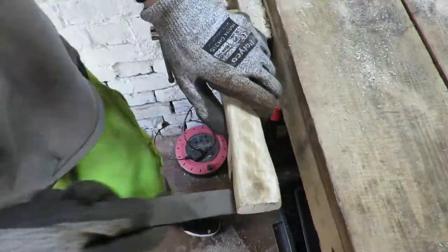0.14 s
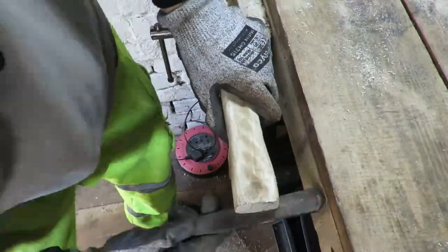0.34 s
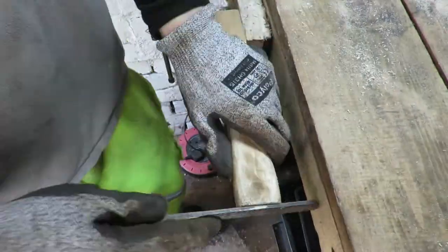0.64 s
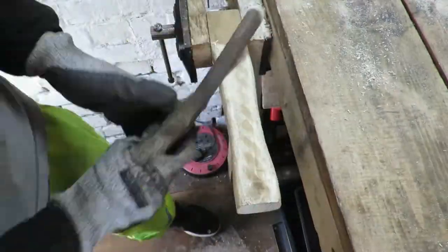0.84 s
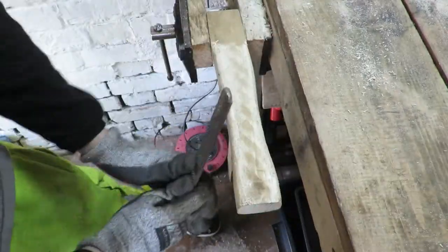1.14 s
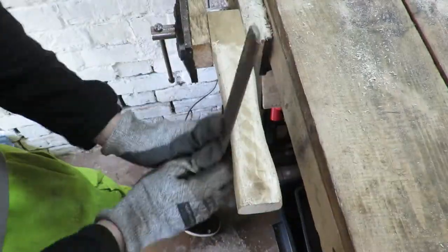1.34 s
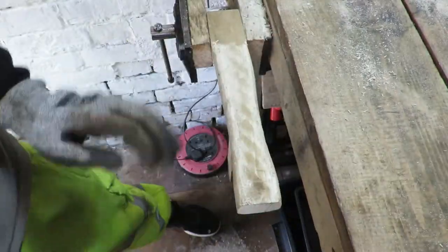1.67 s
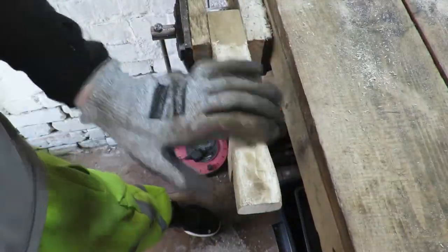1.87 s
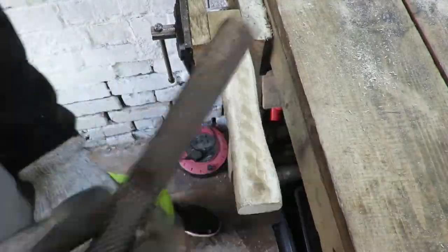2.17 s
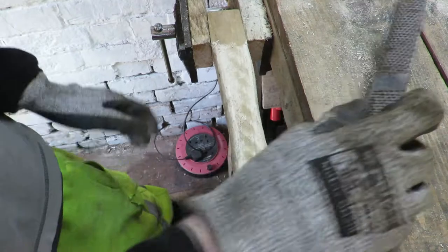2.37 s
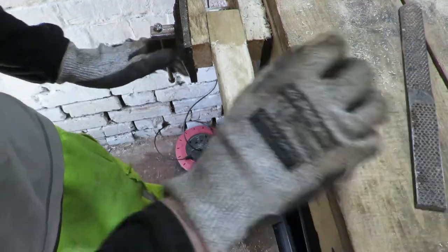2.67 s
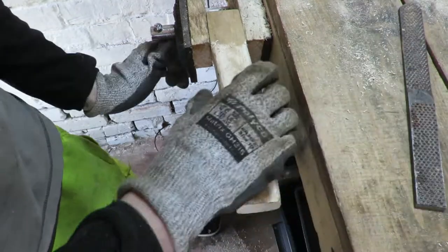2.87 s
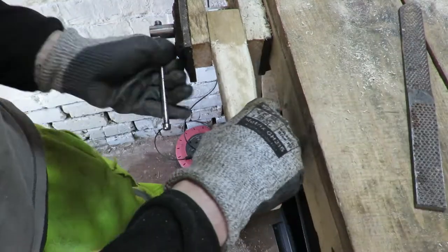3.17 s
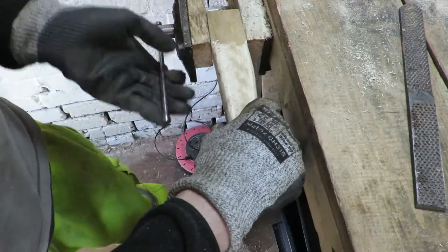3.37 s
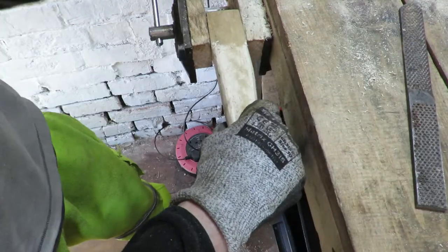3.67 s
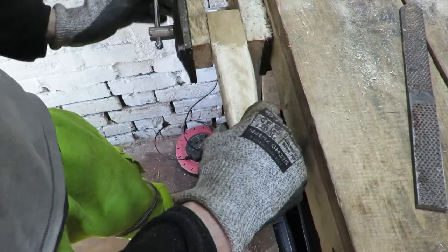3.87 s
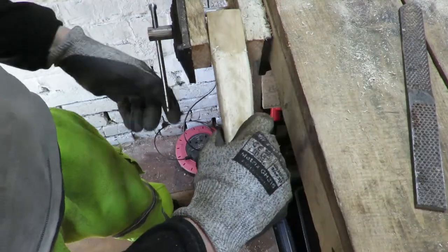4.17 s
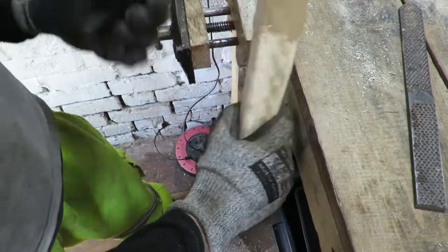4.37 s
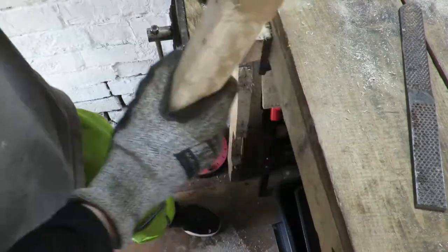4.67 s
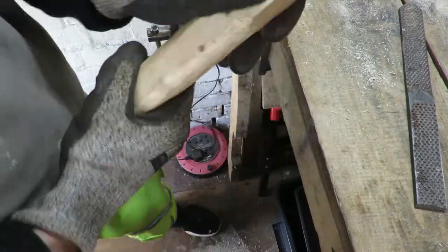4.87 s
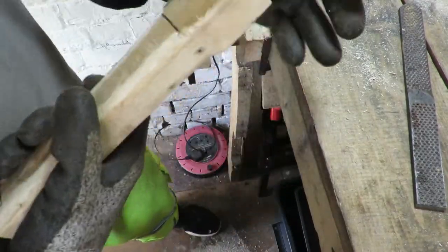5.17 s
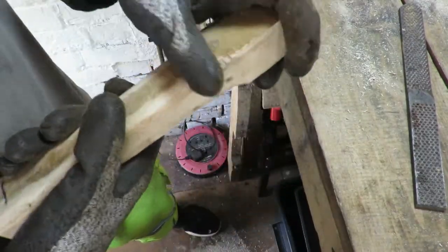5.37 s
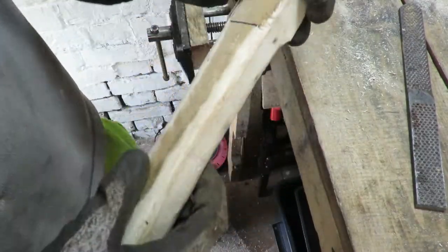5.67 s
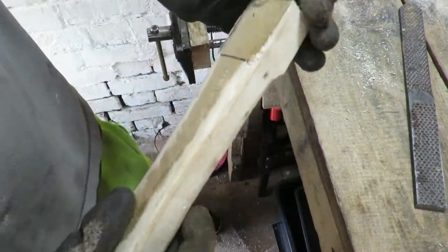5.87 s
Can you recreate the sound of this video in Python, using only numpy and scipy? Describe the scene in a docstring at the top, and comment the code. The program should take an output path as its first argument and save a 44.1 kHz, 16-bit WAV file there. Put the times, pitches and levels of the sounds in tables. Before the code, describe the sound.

Close up in a dry workshop, a coarse steel rasp skips rapidly over a clamped wooden blank, with cracks, chirps and brief squeals. Longer biting strokes follow, groaning and shaking the bench. Gloves rub, then the rasp is dropped on the bench top with a loud bouncing clatter. Quiet handling follows: soft rubs, small wood knocks, a vise bar sliding and one bright clank, ending in faint glove rubbing.

```python
"""Skips, chirps and squeals of a steel rasp on a wooden handle blank, close to the microphones in a dry workshop.
Long strokes then bite and shake the bench; the rasp is dropped on the bench top, the vise bar slides and
clanks, and gloves rub over the blank. Noise grains through spectra make the scraping, gliding sines the
squeals, struck modes the bench and steel. Each source sits slightly right, with short reflections of the room."""
import sys
import numpy as np
from scipy import signal
from scipy.io import wavfile

SR = 44100
rng = np.random.default_rng(int(sys.argv[2]) if len(sys.argv) > 2 else 0)


def transcribe(signal):
    """Save signal, clipped to [-1, 1], as a 16-bit WAV file at the path in sys.argv[1]."""
    frames = np.atleast_2d(signal).T
    limited = np.clip(frames, -1, 1)
    pcm = np.round(limited * 32767).astype(np.int16)
    wavfile.write(sys.argv[1], SR, pcm)


N = 265041
TIME = np.arange(N) / SR  # seconds

# Table levels are relative: each source sets its own balance further on.
# teeth catch an edge and the free blade twangs:
# (time [s], click level [dB], click tilt [dB per octave], twang level [dB], twang pitch [Hz])
CATCHES = [(0, -10.5, 6, -31, 540), (0.023, -45, 2, -26.5, 546), (0.1474, -3, 4.5, -18.5, 724),
           (.268, -8.5, 3.5, -21, 660), (0.2883, -6, 11.5, -31, 637), (0.405, -12.5, 4.5, -25, 690),
           (.561, -7, 0.5, -18.5, 978), (0.8443, -15.5, 1, -24.5, 825)]
# runs of even skips over the wood: (first skip [s], last skip [s], rate [skips per s], scrape level [dB],
# tooth fizz level [dB], fizz growth over the run [dB], chirp pitch [Hz], chirp level [dB], pitch scatter [octaves])
RUNS = [(0.173, 0.293, 53, -28, -30, 5.5, 3410, -29.5, 0.11),
        (0.32, 0.407, 41, -28.5, -47, 19, 2170, -26.5, .06),
        (0.441, 0.468, 60, -23.5, -55, -10.5, 2044, -21, .1),
        (0.563, 0.762, 48, -30.5, -26, -1, 2865, -26, .12),
        (.851, 1.164, 37.3, -23, -18, 12, 2049, -27.5, .18)]
# the blade glides lightly back without biting: (start [s], end [s], level [dB])
GLIDES = [(.022, .09, -31.5), (.1, .145, -43), (.48, .533, -34.5), (.765, .808, -37.5),
          (1.175, 1.195, -21.5)]
# the blade sticks and squeals: (middle [s], length [s], pitch [Hz], level [dB], overtone level [dB])
SQUEALS = [(0.167, .0056, 3090, -17, -18), (0.193, .01, 3530, -19.5, -32),
           (.212, .0054, 2960, -17.5, -11.5), (0.266, .008, 3130, -14, -33), (.325, 0.014, 2174, -28, -48),
           (0.36, 0.0039, 2100, -17.5, -39), (0.367, 0.0064, 2030, -17.5, -39),
           (.397, 0.0056, 2160, -12.5, -21.5), (0.445, 0.011, 2130, -19, -35),
           (0.571, .009, 1735, -12.5, -33.5), (0.584, .007, 2500, -10.5, -21.5),
           (.613, .0034, 3016, -9, -27.5), (0.659, .005, 2824, -11, -21), (0.6974, .0035, 2930, -26.5, -12),
           (.724, .004, 2490, -14, -25), (0.734, .005, 3005, -11.5, -18), (0.864, .012, 2000, -21, -45),
           (1.066, .005, 1570, -13, -28), (1.145, .016, 1536, -19.5, -22),
           (1.021, 0.0055, 1510, -21, -23.5), (1.213, 0.018, 621, -23.5, -22.5),
           (1.266, .005, 1950, -12, -16), (1.308, .01, 1800, -16, -26), (1.344, .009, 1700, -17, -31.5),
           (1.537, .047, 1327, -24, -45), (1.632, .034, 1344, -15.5, -33), (1.656, .02, 2020, -17, -40),
           (1.676, .045, 970, -19, -54), (1.68, 0.037, 3025, -26.5, -33)]
# long biting strokes: (start [s], end [s], cutting level [dB], growth over the stroke [dB],
# bench shudder level [dB], tooth fizz level [dB])
STROKES = [(1.189, 1.218, -16.5, -3.5, -15, -41), (1.249, 1.356, -17, 0, -32, -33),
           (1.412, 1.57, -28.5, -10.5, -25.5, -42), (1.597, 1.707, -20, 0, -24, -30.5)]
# the rasp lands on the bench top, tip and heel bouncing: (time [s], level [dB], tilt [dB per octave],
# rattle decay [s], knock pitch [Hz], steel ring level [dB])
BOUNCES = [(2.7325, 1.5, 0, 0.0033, 893, -40), (2.744, -12.5, 0, 0.022, 1023, -53),
           (2.765, -15, -2, 0.0082, 1190, -48), (2.768, -14, -1, 0.019, 690, -42),
           (2.794, -11.5, 1.5, 0.012, 892, -48), (2.802, -13, 1, 0.02, 1355, -33),
           (2.843, -26, -1, .03, 1340, -43)]
# wood knocks on bench and vise: (time [s], level [dB], tilt [dB per octave], rattle decay [s])
KNOCKS = [(1.2, -18.5, -.5, 0.11), (1.259, -11, 1, 0.003), (1.418, -25, 4.5, 0.023),
          (1.539, -19.5, -1.5, 0.096), (1.714, -14, -0.5, 0.021), (1.763, -18, -18, 0.0097),
          (1.837, -34, -3, 0.032), (1.919, -32.5, 0.5, 0.033), (2.001, -31.5, -6.5, 0.023),
          (2.07, -22.5, -13, 0.023), (2.129, -20.5, -0.5, 0.018), (2.552, -45.5, 0, 0.0099),
          (3.681, -42.5, 0.5, 0.072), (3.835, -31.5, 1, 0.06), (3.864, -20, 9.5, 0.0029),
          (3.871, -25.5, 1.5, 0.022), (4.021, -33.5, 1.5, 0.024), (4.091, -25, 0, 0.017),
          (4.147, -24.5, 1, 0.012), (4.374, -35.5, .5, 0.075), (4.53, -25, -2.5, 0.026),
          (4.551, -22.5, -1.5, 0.037), (4.652, -28.5, 2.5, 0.05), (4.822, -19.5, -3, .022),
          (5.428, -43, 6.5, 0.0066)]
# the loose vise bar clanks against its stop: (time [s], level [dB])
CLANKS = [(1.263, -23), (4.725, -34), (4.758, -31), (4.8151, -7)]
# the vise bar slides through its hole: (middle [s], length [s], level [dB])
BAR_SLIDES = [(4.658, 0.0049, -36.5), (4.732, 0.018, -31), (4.775, 0.019, -36), (4.81, .013, -22.5)]
# gloves rub over wood and steel: (start [s], end [s], rise [s], level [dB], knit brushing relative to it [dB])
RUBS = [(1.781, 2.04, 0.014, -54.5, -20.5), (2.04, 2.299, 0.0074, -33.5, -3.5),
        (2.323, 2.72, 0.018, -48, -18), (2.5, 2.573, .03, -45, -13.5), (3.076, 3.6, .03, -62, -11),
        (3.4, 3.478, .02, -59, -5), (3.65, 3.75, .04, -45, 2), (3.767, 3.935, 0.095, -38, -13),
        (3.999, 4.04, 0.0072, -42.5, -21), (4.125, 4.15, 0.0082, -38, -23), (4.18, 4.52, 0.057, -51, -13),
        (4.514, 4.539, 0.021, -41.5, 9.5), (4.584, 4.8, 0.025, -46.5, -17.5), (4.934, 5.66, .02, -57.5, -6),
        (5.099, 5.255, .06, -63.5, 15.5), (5.405, 5.48, .02, -51, -8), (5.645, 5.897, 0.072, -41.5, -2),
        (5.905, 6.0, 0.0067, -47, -9)]
# the worker leans and pulls on the bench: (start [s], end [s], rumble level [dB])
LEANS = [(1.203, 1.75, -41), (2.048, 2.099, -33), (2.67, 2.8, -46), (3.791, 4.15, -36.5), (4.466, 4.8, -46),
         (5.76, 6.0, -70)]

# spectrum of teeth scraping wood: (frequency [Hz], level [dB])
SCRAPE = [(60, -51), (180, -12), (400, -13), (700, -6), (1150, -7.5), (1600, -3.5), (2500, -2),
          (3300, -10.5), (4800, -12), (6000, -13.5), (8000, -20), (11000, -21.5), (16000, -36)]
# spectrum of the bright tooth fizz: (frequency [Hz], level [dB])
FIZZ = [(200, -61.5), (2000, -25), (4200, -2.5), (5500, -24), (6500, -12.5), (7280, 5), (7800, -24),
        (8700, -14), (9350, 6.5), (9900, -4), (10500, -8), (11300, 3), (13600, -4), (15500, 0.5)]
# spectrum of a biting cut: (frequency [Hz], level [dB])
CUT = [(200, -31), (450, -6), (620, 3), (760, -4.5), (950, 0), (1150, -42.5), (1350, 2.5), (1800, 4),
       (2400, -0.5), (3400, -15), (4250, -6), (5600, -17.5), (9000, -21), (14000, -62)]
# spectrum of the shaken bench: (frequency [Hz], level [dB])
SHUDDER = [(40, -38), (100, -6), (165, -13.5), (215, 12.5), (260, -5), (320, 8.5), (400, -11.5), (520, -33),
           (900, -39.5)]
# spectrum of the plank under the dropped rasp: (frequency [Hz], level [dB])
PLANK = [(35, -27.5), (95, 1.5), (150, -10.5), (240, 2), (340, 5), (540, -5.5), (850, -0.5), (1500, -3),
         (2300, -12), (3500, -25.5), (5400, -37), (11400, -47.5), (15000, -50)]
# spectrum of a blow on vise and bench: (frequency [Hz], level [dB])
THUD = [(40, -18), (100, 6.5), (230, 8.5), (350, 14), (520, 3), (850, 0.5), (1500, -5), (2300, -10),
        (4000, -17), (8000, -33.5), (16000, -46)]
# spectrum of glove rubbing: (frequency [Hz], level [dB])
GLOVE = [(100, -7), (300, -1.5), (600, -2), (1100, -1), (2000, 3), (2800, -1), (4200, -8), (6400, -13.5),
         (9000, -18.5), (12700, -17.5), (16000, -30)]
# spectrum of the leaned-on bench: (frequency [Hz], level [dB])
RUMBLE = [(20, -1.5), (45, -3), (92, 3), (140, -7), (200, -11), (350, -12), (520, -23), (900, -23),
          (2000, -53)]
# spectrum of the workshop air: (frequency [Hz], level [dB])
AIR = [(20, -18.5), (90, -9), (220, -3.5), (460, -5.5), (1100, -14.5), (1700, -17), (2600, -11),
       (3100, -20.5), (6000, -27.5), (12000, -37), (16000, -42)]
# modes of the bench: (frequency [Hz], level [dB], time to fall 60 dB [s])
BENCH = [(236, -0.5, 0.12), (104, -41, .3), (327.6, -4.5, 0.23), (386, -6, 0.09), (450, -1.5, 0.21),
         (594, -10, 0.086), (632, 6.5, 0.11), (822, -5.5, 0.057), (1021, -0.5, 0.088), (1316, 7, 0.12),
         (1660, -36, 0.034), (1735, 0.5, 0.084), (1620, -13, 0.052), (1813, -29, 0.055), (2116, 2, 0.091),
         (2296, 4, 0.08), (3030, -11, 0.14), (4067, 1, 0.03), (4660, -11, 0.048)]
# modes of the steel rasp: (frequency [Hz], level [dB], time to fall 60 dB [s])
RASP = [(2640, -22, .3), (4262, -1, .17), (8265, -25.5, 0.5), (8721, -19, 0.3), (11400, -19, .22),
        (14580, -30.5, .3)]
# modes of the vise bar: (frequency [Hz], level [dB], time to fall 60 dB [s])
VISE_BAR = [(2670, -13.5, .1), (3260, -9.5, .09), (3415, 0, 0.03), (3733, -11, .085), (4290, -1.5, .03),
            (5450, -5, .06), (7310, -4, 0.12), (11680, -11, 0.099), (15800, -15.5, .075)]
# decay of the room's reflections: (frequency [Hz], time to fall 60 dB [s])
ROOM = [(100, 0.33), (500, 0.19), (2000, 0.059), (6000, 0.072), (15000, 0.062)]

SKIP_SHARE = 0.42  # length of a skip at half height, as a share of the time between skips
SKIP_SPREAD_DB = 2.06  # chance in level from skip to skip
DRAG_DB, DRAG_FADE_S = -9.5, 0.0077  # between skips the blade still drags, this far under the run
SQUEAL_SCRAPE_DB = -7.5  # the scraping that comes with a squeal or chirp, relative to it
BITE_S, LIFT_S, SHUDDER_FADE_S = 0.005, 0.017, 0.055  # the teeth bite and lift quickly; the bench shakes on
CLANK_TILT_DB, CLANK_RATTLE_S, CLANK_RING_DB = 6.5, 0.0098, -1  # tilt per octave; rattle decay; bar ring
SLIDE_HISS_DB = 5.5  # direct hiss of the sliding bar, beside its ring
RELEASE_S = 0.018  # a rub dies away
LEAN_S, SETTLE_S, RESTING_DB = 0.039, 0.15, -60.5  # rumble builds, settles, and stays on from the first lean
AIR_DB = -53
EDGE_HZ = 15900  # upper band limit


def chatter(arch=0.048, sag=0.01932, third_db=-13, chirp_octave_db=-10, glide_fizz_db=-2):
    """Each skip is a spindle of scraping with a rough chirp whose pitch arches and sags; squeals stand out."""
    squeal, scrape, fizz = np.zeros((3, N))
    wobble = 1 + 0.04 * wander(500)
    rough = 1 + 0.45 * wander(700)
    teeth = grains(2500, 3.2, 0.55)
    fine_teeth = grains(3500, 3, 0.7)
    chirps = []
    for s, length, hz, chirp_db, scrape_db, fizz_db in skips():
        at, shape = swell(s, length)
        scrape[at] += shape * amp(scrape_db)
        fizz[at] += shape * amp(fizz_db)
        chirps.append((s, length, hz, chirp_db, chirp_db + chirp_octave_db))
    for s, length, hz, squeal_db, octave_db in chirps + SQUEALS:
        at, shape = swell(s, length)
        u = np.clip((TIME[at] - s) / length, -2, 2)
        pitch = hz * (1 - arch * u ** 2 - sag * u) * wobble[at]
        turn = 2 * np.pi * np.cumsum(pitch) / SR
        upper = np.sin(3 * turn) + 0.5 * np.sin(4 * turn)
        overtones = np.sin(2 * turn) + amp(third_db) * upper
        voice = amp(squeal_db) * np.sin(turn) + amp(octave_db) * overtones
        squeal[at] += shape * voice * np.sqrt(2)
        # scraping adds in power
        scrape[at] = np.hypot(scrape[at], shape * amp(squeal_db + SQUEAL_SCRAPE_DB))
    # between skips the blade still drags lightly
    touches = GLIDES + [(first, last, scrape_db + DRAG_DB) for first, last, _, scrape_db, *_ in RUNS]
    drag = sum(amp(db) * hold(start, end, DRAG_FADE_S, DRAG_FADE_S) for start, end, db in touches)
    scraping = (scrape + drag) * colour(blade(teeth), SCRAPE)
    fizzing = (fizz + amp(glide_fizz_db) * drag) * colour(blade(fine_teeth), FIZZ)
    return rough * squeal + scraping + fizzing


def skips():
    """Spaces skips evenly over each run: rows of (s, length s, chirp Hz, chirp dB, scrape dB, fizz dB)."""
    rows = []
    for first, last, per_s, scrape_db, fizz_db, growth_db, hz, chirp_db, scatter in RUNS:
        times = np.linspace(first, last, round((last - first) * per_s) + 1)
        chances = rng.standard_normal((len(times), 2))
        for s, (force, pitch) in zip(times, chances):
            db = SKIP_SPREAD_DB * force
            progress = (s - first) / (last - first) - 0.5
            rows.append((s, SKIP_SHARE / per_s, hz * 2 ** (scatter * pitch), chirp_db + db, scrape_db + db,
                         fizz_db + growth_db * progress + db))
    return rows


def catches(click_s=0.0012, twang_s=0.006):
    """A sharp crack, then a short low twang of the blade."""
    out, t = np.zeros(N), TIME[:SR // 10]
    for s, click_db, tilt_db, twang_db, hz in CATCHES:
        burst = rng.choice([-1., 1.], len(t)) * np.exp(-t / click_s)
        crack = colour(burst, SCRAPE, tilt_db)
        twang = 2 * np.sin(2 * np.pi * hz * t) * np.exp(-t / twang_s)
        twang *= (1 - np.exp(-t / click_s)) ** 2  # builds as the crack dies
        add(out, s, amp(click_db) * crack + amp(twang_db) * twang)
    return out


def strokes(judder_db=1.5, ring_db=-3, cut_db=-3, shudder_db=-3, fizz_db=-2, fizz_tilt_db=-5.0, travel_db=7.5):
    """Rows of teeth tear through the wood; the vise passes the shaking on to the bench."""
    teeth = grains(1000, 3.2, 0.3) * unit(amp(judder_db * wander(70)))
    cutting, shaking, fizzing = np.zeros((3, N))
    for start, end, db, growth_db, shake_db, tooth_db in STROKES:
        growth = amp(growth_db * np.interp(TIME, [start, end], [-0.5, 0.5]))
        push = hold(start, end, BITE_S, LIFT_S) * growth
        cutting += amp(db) * push
        fizzing += amp(tooth_db) * push
        shaking += amp(shake_db) * hold(start, end, BITE_S, SHUDDER_FADE_S)
    force = teeth * cutting
    # as the contact travels along the blank it feeds now one mode, now another
    ringing = np.zeros(N)
    for mode in BENCH:
        feed = force * unit(amp(travel_db * wander(21.0)))
        ringing += signal.oaconvolve(feed, ring([mode]))[:N]
    ringing /= np.linalg.norm(ring(BENCH))
    shudder = unit(colour(teeth, SHUDDER)) * shaking
    fizz = colour(blade(teeth), FIZZ, fizz_tilt_db) * fizzing
    return amp(cut_db) * colour(force, CUT) + amp(ring_db) * ringing + amp(shudder_db) * shudder + amp(fizz_db) * fizz


def blade(x, ring_s=0.0036, direct=0.48, travel_db=3):
    """The crowded, quickly damped modes of the steel blade shift as the contact travels along it."""
    t = TIME[:SR // 30]
    weights = np.array([amp(travel_db * wander(11)) for _ in range(3)])
    weights /= np.linalg.norm(weights, axis=0)
    taps = rng.standard_normal((3, len(t))) * np.exp(-t / ring_s)
    ringing = sum(w * signal.oaconvolve(x, h / np.linalg.norm(h))[:N] for w, h in zip(weights, taps))
    return direct * x + 0.73 * ringing


def dropped_rasp(blow=3.7, knock_db=-4, knock_length=7, build_s=0.002):
    """Each bounce knocks a different spot of the plank; the blade rings up as it lifts clear."""
    out = np.zeros(N)
    steel = ring(RASP) * (1 - np.exp(-TIME[:SR // 2] / build_s))
    for s, db, tilt_db, rattle_s, hz, steel_db in BOUNCES:
        knock = ring([(hz, knock_db, knock_length * rattle_s)])
        wood = colour(contact(rattle_s, blow), PLANK, tilt_db) + knock
        add(out, s, amp(db) * wood + amp(steel_db) * steel)
    return out


def knocks():
    """Wood thuds on vise and bench, each a blow with a dying rattle."""
    out = np.zeros(N)
    for s, db, tilt_db, rattle_s in KNOCKS:
        add(out, s, amp(db) * thud(tilt_db, rattle_s))
    return out


def clanks():
    """The loose vise bar thuds brightly against its stop and rings in its steel modes."""
    out = np.zeros(N)
    for s, db in CLANKS:
        blow = thud(CLANK_TILT_DB, CLANK_RATTLE_S)
        add(out, s, amp(db) * (blow + amp(CLANK_RING_DB) * ring(VISE_BAR)))
    return out


def thud(tilt_db, rattle_s, bench_db=-27, blow=1.43):
    """One blow through vise and bench; a higher tilt brightens both blow and modes."""
    modes = [(hz, mode_db + tilt_db * np.log2(hz / BENCH[0][0]) / 2, t60) for hz, mode_db, t60 in BENCH]
    return colour(contact(rattle_s, blow), THUD, tilt_db) + amp(bench_db) * ring(modes)


def contact(rattle_s, blow):
    """One firm blow with a rattle that dies exponentially."""
    t = TIME[:SR // 2]
    return rng.choice([-1., 1.], len(t)) * np.exp(-t / rattle_s) + blow * (t == 0)


def handling():
    """Gloves, the sliding bar and the leaned-on bench, all at the vise; bar and gloves share a rubbing texture."""
    palm, knit = glove_textures()
    return gloves(palm, knit) + bar_slides(palm, knit) + leaning()


def glove_textures(flutter_db=2.17, brush_db=-0.35, snag_db=-11, snags_per_s=45):
    """The rubber palm rubs dully and snags now and then, while the knit back brushes brightly."""
    fibres = grains(4000, 2.5, 1.4) * amp(flutter_db * wander(50))
    snags = amp(snag_db) * grains(snags_per_s, 0.97, 0)
    palm = colour(fibres + snags, GLOVE) * unit(amp(brush_db * wander(16) / 2))
    knit = colour(rng.standard_normal(N), GLOVE, tilt_db=5.5) * unit(amp(brush_db * wander(29)))
    return palm, knit


def gloves(palm, knit):
    """Each rub presses the palm and brushes the knit over wood and steel."""
    pressure, brushing = np.zeros((2, N))
    for start, end, rise_s, db, knit_db in RUBS:
        rub = amp(db) * hold(start, end, rise_s, RELEASE_S)
        pressure += rub
        brushing += amp(knit_db) * rub
    return pressure * palm + brushing * knit


def bar_slides(palm, knit):
    """The rubbing of the sliding vise bar excites its modes, so it hisses and sings."""
    sliding, bar = np.zeros(N), ring(VISE_BAR)
    for s, length, db in BAR_SLIDES:
        at, shape = swell(s, length)
        sliding[at] += amp(db) * shape
    slide = sliding * (palm + 0.17 * knit)
    singing = signal.oaconvolve(slide, bar / np.linalg.norm(bar))[:N]
    return singing + amp(SLIDE_HISS_DB) * slide


def leaning():
    """The bench rumbles under the worker's weight: low noise that builds and settles."""
    load = amp(RESTING_DB) * (TIME > LEANS[0][0])
    for start, end, db in LEANS:
        load = load + amp(db) * hold(start, end, LEAN_S, SETTLE_S)
    return load * colour(rng.standard_normal(N), RUMBLE)


def workshop_air():
    """Quiet noise of the place, partly common to both channels and partly separate."""
    air = amp(AIR_DB) * np.array([colour(rng.standard_normal(N), AIR) for _ in range(2)])
    return 0.084 * air.mean(0) + 0.58 * air


def room(x):
    """Dense short reflections, unlike on each side, dying at a rate set by frequency."""
    taps = rng.standard_normal((2, SR // 3)) * (rng.random((2, SR // 3)) < 0.15)
    taps[:, :SR // 1000] = 0  # nothing returns within the first millisecond
    hz, t, z = signal.stft(taps, SR, nperseg=256)
    decay = amp(-60 * t / read(ROOM, hz)[:, None])
    tail = signal.istft(z * decay, SR, nperseg=256)[1]
    walls = [(60, -23.0), (250, -1.0), (700, 0.5), (15000, 6.5)]  # (frequency [Hz], level [dB])
    tail = np.array([colour(side, walls) for side in tail])
    return signal.oaconvolve(x[None], tail / np.linalg.norm(tail, axis=1, keepdims=True), axes=1)[:, :N]


def place(x, right_db, room_db, width_db):
    """Sets a source to one side; the bench top reflects its treble differently to each microphone port."""
    glance = np.roll(x, 37)  # samples of delay
    treble = signal.butter(1, 2500, "high", fs=SR, output="sos")
    glance = signal.sosfilt(treble, glance) * np.array([[1], [-1]])
    sides = amp(np.array([[-right_db], [right_db]]) / 2)
    return (x + amp(width_db) * glance + amp(room_db) * room(x)) * sides


def amp(db):
    """Decibels to gain."""
    return 10 ** (np.asarray(db) / 20)


def unit(x):
    """Scales to rms 1."""
    return x / np.sqrt(np.mean(x ** 2) + 1e-20)


def read(points, hz):
    """Reads a table on a log-frequency axis."""
    f, value = np.transpose(points)
    return np.interp(np.log(hz + 1), np.log(f + 1), value)


def add(mix, s, sound):
    """Mixes a sound in at time s."""
    part = mix[max(round(s * SR), 0):][:len(sound)]
    part += sound[:len(part)]


def colour(x, spectrum, tilt_db=0):
    """Causal minimum-phase filter of unit energy with the given spectrum, tilted per octave above 200 Hz."""
    hz = np.fft.rfftfreq(4096, 1 / SR)
    tilt = tilt_db * np.log2(np.maximum(hz, 200))
    log_gain = np.log(amp(read(spectrum, hz) + tilt))
    circle = np.r_[log_gain, log_gain[-2:0:-1]]
    taps = np.fft.ifft(np.exp(np.conj(signal.hilbert(circle)))).real
    return signal.oaconvolve(x, taps / np.linalg.norm(taps))[:len(x)]


def ring(modes):
    """The dying sines of a struck object, alternating in sign."""
    t = TIME[:SR // 2]
    out = np.zeros(len(t))
    for k, (hz, db, t60) in enumerate(modes):
        out += (-1) ** k * amp(db - 60 * t / t60) * np.sin(2 * np.pi * hz * t)
    return out


def wander(rate_hz):
    """Slow chance of rms 1: noise low-passed at the rate."""
    lowpass = signal.butter(2, rate_hz, fs=SR, output="sos")
    return unit(signal.sosfilt(lowpass, rng.standard_normal(N)))


def grains(per_s, spread_db, hiss):
    """Fibres snapping: clicks of uneven size over a fine hiss."""
    sizes = amp(spread_db * np.minimum(rng.exponential(1, N), 4)) * rng.choice([-1, 1], N)
    clicks = unit(sizes * (rng.random(N) < per_s / SR))
    return unit(clicks + hiss * rng.standard_normal(N))


def swell(s, length):
    """A spindle as wide as the given length at half height: its samples and their gains."""
    at = np.flatnonzero(abs(TIME - s) < 4 * length)
    return at, 1 / np.cosh(2 * np.arccosh(2) * (TIME[at] - s) / length)


def hold(start, end, attack_s, release_s):
    """Gain over time: rises from start, holds until end, then dies away."""
    rise = 1 - np.exp(-np.maximum(TIME - start, 0) / attack_s)
    return rise * np.exp(-np.clip((TIME - end) / release_s, 0, 20))


def scene():
    """All sources, main one first, over the quiet air of the workshop."""
    return (place(chatter() + catches(), right_db=1.5, room_db=-6.5, width_db=-20.5)
            + place(strokes(), right_db=2.0, room_db=-7.5, width_db=-16.5)
            + place(dropped_rasp(), right_db=2.5, room_db=-9, width_db=-8.5)
            + place(knocks() + clanks(), right_db=2.0, room_db=-10, width_db=-8)
            + place(handling(), right_db=1.0, room_db=-4.5, width_db=-21.0)
            + workshop_air())


def record(dry):
    """Peaks beyond full scale clip at the microphones; then the band limit."""
    clipped = np.clip(dry, -1, 1)
    lowpass = signal.firwin(255, EDGE_HZ, window=("kaiser", 8), fs=SR)
    return signal.oaconvolve(clipped, lowpass[None], "same")


dry = scene()
out = record(dry)
transcribe(out)
```